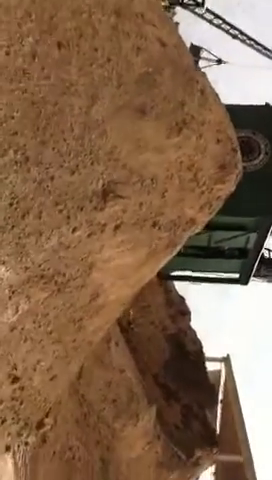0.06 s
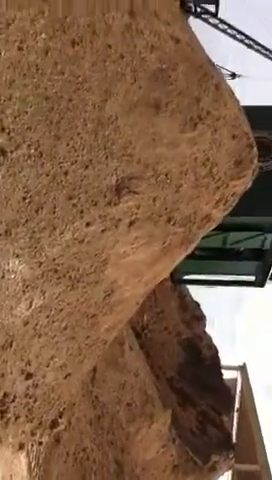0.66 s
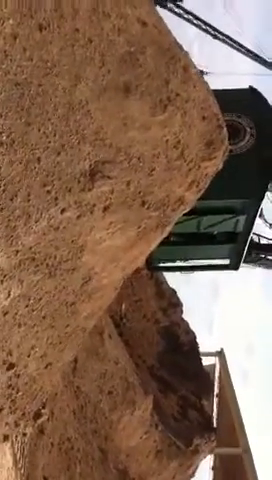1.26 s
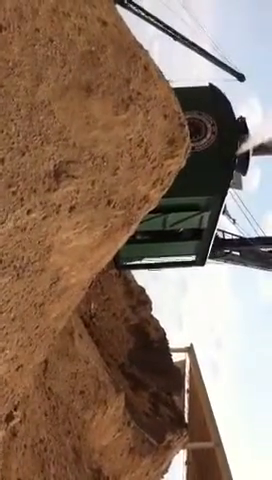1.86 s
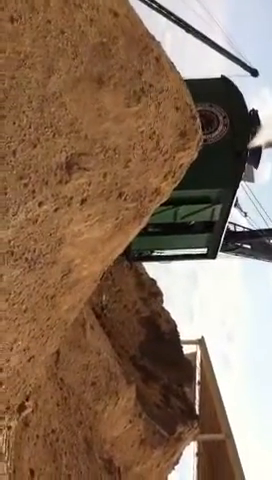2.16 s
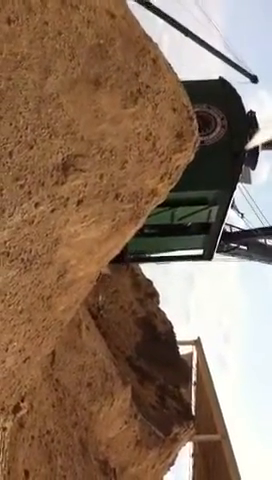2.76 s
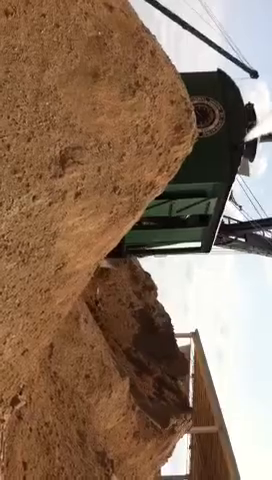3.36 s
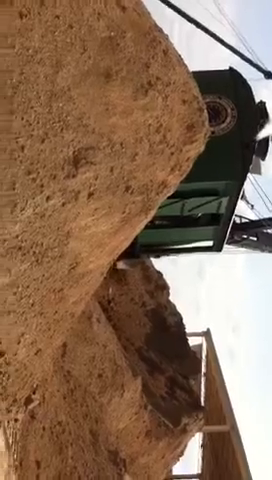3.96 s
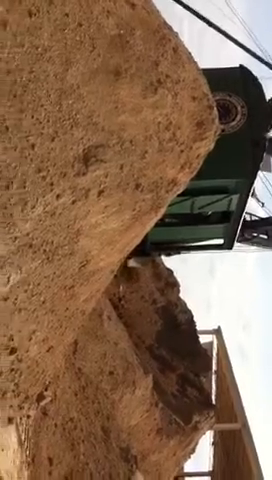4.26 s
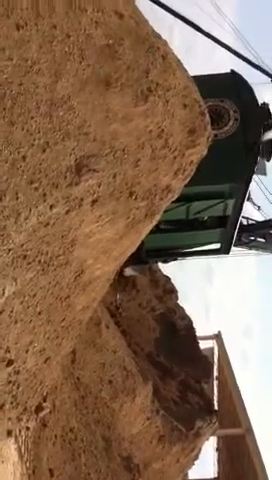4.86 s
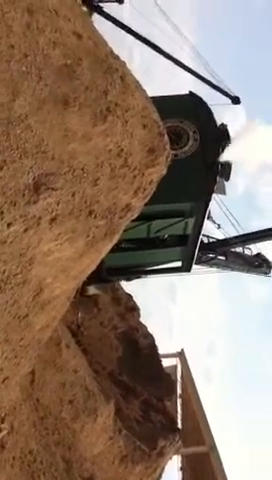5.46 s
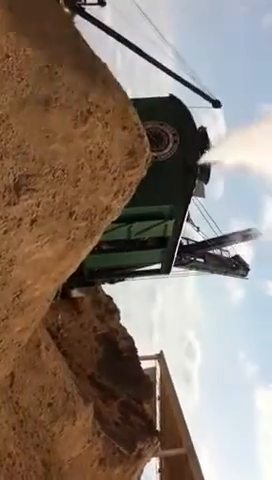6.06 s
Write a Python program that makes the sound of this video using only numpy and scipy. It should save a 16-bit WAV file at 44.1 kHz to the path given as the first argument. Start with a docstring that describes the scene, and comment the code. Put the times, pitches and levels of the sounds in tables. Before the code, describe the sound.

A steam shovel works outdoors, heard from one spot. For the first two seconds its gears rumble and clatter, chain links twitter, and leaking steam sings thinly and wheezes about twice a second over a soft chimney draught. From 0.5 seconds loose iron knocks irregularly, booming in the cab. The rumble and clatter swell toward 2.2 seconds, with a brake's short, stuttering squeals from about 1.8 to 2.3.

At 2.3 seconds the engine starts chuffing hard, louder than before, at roughly fourteen slightly uneven beats a second. Each puff is a hollow bark with a bright, spitting hiss, and the clatter fades beneath them. At about 4.3 seconds the chuffing dies away, leaving the soft draught and a low rumble. At 5.4 seconds it restarts with a brief spray of steam and keeps chuffing and hissing until the end, at about six seconds.

```python
"""A steam shovel works in the open air. First it swings behind a heap of earth: gears rumble and clatter,
chain links twitter, a soft draught blows up the stack (its chimney) and leaking steam sings and wheezes.
Loose iron knocks, a cab panel booms and a friction band squeals on its drum. At 2.3 s the engine takes
the load and chuffs hard through the stack, about fourteen beats a second. At 4.3 s it rests for a second,
leaving the draught and a low rumble, and then it starts again."""
import sys
import numpy as np
from scipy.fft import rfft, irfft, next_fast_len
from scipy.io import wavfile
from scipy.ndimage import map_coordinates

SR = 44100
rng = np.random.default_rng(int(sys.argv[2]) if len(sys.argv) > 2 else 0)


def transcribe(signal):
    """Save signal, clipped to [-1, 1], as a 16-bit WAV file at the path in sys.argv[1]."""
    frames = np.atleast_2d(signal).T
    limited = np.clip(frames, -1, 1)
    pcm = np.round(limited * 32767).astype(np.int16)
    wavfile.write(sys.argv[1], SR, pcm)


N = 269892
TIME = np.arange(N) / SR

# A TONE table gives a noise its balance of low and high. A MODES table lists the pitches a part rings at.
# How loud the low rumble is heard: it swells with the swing, dips under the chuffs
# and returns in the pause: time_s, level_db
RUMBLE_LEVELS = [(0, -42), (1.3, -39), (1.75, -39.5), (2.17, -33.5), (2.65, -43.5), (3.4, -50.5),
                 (3.8, -51), (4.5, -51), (4.75, -44.5), (5.35, -45), (5.65, -55)]
# The shaking frame: frequency_hz, level_db
FRAME_TONE = [(25, -34), (55, -25), (80, -15), (120, -3.5), (160, 0.5), (225, 1), (300, -2.5), (370, -4),
              (450, -21), (700, -36.5)]
# The low and the higher boom of a cab panel: frequency_hz, level_db
PANEL_LOW_TONE = [(130, -47), (195, -15), (212, 1), (230, -3.5), (330, -74)]
PANEL_HIGH_TONE = [(200, -50), (265, -3), (288, 7), (315, 0), (420, -62)]
# The effort of the swing, heard as clatter: time_s, level_db
CLATTER_LEVELS = [(0, -39), (1, -39.5), (1.7, -37.5), (2.05, -31), (2.3, -28), (2.9, -54), (3.2, -75)]
# Gear teeth and chains clattering: frequency_hz, level_db
CLATTER_TONE = [(210, -33), (350, -4), (537, -1.5), (726, 0), (878, -5.5), (1350, -5), (1610, -5.5),
                (2100, -8.5), (3080, -13.5), (3380, -21.5), (5190, -24), (6590, -20), (8230, -26.5),
                (9640, -27.5), (15500, -69.5)]
# The ringing of the stack: pitch_hz, width_hz, level_db
STACK_MODES = [(216, 50, -13.5), (322.6, 21.4, -5.5), (622, 143, -8), (753.5, 54, -3.5), (966, 108, -6),
               (1329, 124, -1), (1634, 157, 1), (1940, 318, 0), (2348, 240, 4), (2996, 263, -2.5),
               (3480, 234, -6), (3850, 230, -10), (4517, 140, -8.5)]
# Slow steam in the stack: frequency_hz, level_db
ROAR_TONE = [(150, 0), (220, 2), (320, -13), (450, 10), (750, 6.5), (1200, 3.5), (1400, -0.5), (1700, -1),
             (2200, -6), (2450, -3), (2600, -4.5), (2950, -11), (5000, -11)]
# The fizz of the draught: frequency_hz, level_db
FIZZ_TONE = [(2000, -28), (3000, -2), (4200, -12), (5400, -10), (6000, -2.5), (8000, -0.5), (9000, -10),
             (9700, -17), (10600, -6), (11400, -3.5), (13000, -10), (15500, -21)]
# Thin leaks at the pipe joints: pitch_hz, width_hz, level_db
PIPE_LEAKS = [(1610, 59, -61), (3390, 150, -54), (9700, 1200, -59.5)]
# Steam slipping past a gland, the seal around a moving rod: middle_s, spread_s, level_db
GLAND_WHEEZES = [(0.52, 0.1, -45), (1.12, 0.053, -46), (1.625, 0.11, -46), (2.03, 0.072, -61),
                 (2.143, 0.011, -33), (2.28, .06, -55)]
# The hiss of that gland: frequency_hz, level_db
GLAND_TONE = [(2500, -36), (4500, -10), (5600, -8.5), (6600, 1.5), (7500, -8), (11000, -13), (15500, -29)]
# Slack gears catching up with a knock: start_s, level_db, treble_db
GEAR_KNOCKS = [(0.524, -18.5, -7), (0.8, -22.5, -10), (1.101, -18, -18), (1.345, -26.5, 6.5),
               (1.62, -19.5, -2), (1.787, -28, -4), (1.998, -19, -10), (2.124, -17.5, 4.5),
               (2.209, -26, -12), (2.256, -28, -6)]
# The ringing of the cab: pitch_hz, width_hz, level_db
CAB_MODES = [(220, 50, -7), (626, 49, 2.5), (734, 51, 3.5), (980, 140, -7), (1237, 73, -5.5),
             (1570, 120, -7), (2310, 280, -13)]
# The sharp crack of a knock: frequency_hz, level_db
CRACK_TONE = [(500, -30), (1500, 6), (3500, -8), (5000, -14), (15000, -28)]
# The friction band grabbing its drum: start_s, length_s, pitch_hz, level_db
BAND_GRABS = [(1.788, 0.014, 1620, -30.5), (1.957, 0.015, 1620, -31), (2.019, 0.02, 1782, -22),
              (2.044, 0.069, 1676, -27.5), (2.126, 0.05, 1740, -27), (2.202, .08, 1680, -30)]
# The ringing of the band: pitch_hz, width_hz, level_db
RASP_MODES = [(1255, 40, -3), (1584, 33, 3.5), (2154, 25, 1), (2340, 45, -1)]
# The throttle (the steam tap) opening for a run of beats: start_s, lead_in_s, thump_db, spray_db
THROTTLE_OPENINGS = [(2.32, .01, -37, -50), (3.115, 0.012, -46, -31), (5.403, 0.051, -46, -26)]
# The engine's puffs of used steam: start_s, level_db
BEATS = [(2.309, -11.0), (2.358, -13.5), (2.403, -12.0), (2.492, -15.0), (2.532, -14.0), (2.593, -16),
         (2.644, -15.5), (2.71, -16), (2.785, -14.5), (2.847, -15), (2.958, -13), (3.106, -11.5),
         (3.155, -20), (3.213, -13.5), (3.299, -15.5), (3.391, -17.5), (3.469, -16.5), (3.542, -15.5),
         (3.608, -14.5), (3.667, -14.5), (3.746, -15.5), (3.792, -15.0), (3.871, -17.5), (3.933, -13.5),
         (4.011, -15.5), (4.086, -14), (4.16, -14.0), (4.277, -15.0), (5.38, -10.5), (5.492, -13.0),
         (5.598, -15.5), (5.665, -16), (5.742, -17.0), (5.788, -16.5), (5.87, -16.0), (5.943, -14),
         (6.042, -13.0)]
# How the hiss of the steam jet rises and falls against the bark of the beats: time_s, level_db
HISS_LEVELS = [(2.31, -10.5), (2.68, -3.0), (2.85, -5.0), (3.12, -7.5), (3.33, 1), (3.5, -6), (3.8, -1.5),
               (4.33, -4), (5.37, -9.5), (5.63, -2.5), (5.95, -6.5)]
# The jet from the nozzle in the stack: frequency_hz, level_db
JET_TONE = [(3000, -60), (4300.0, -14), (4900.0, -9), (5800.0, -1.5), (6600.0, 1.1), (8200.0, -5),
            (9700.0, -20), (10800.0, -10), (12500.0, -12), (14000.0, -18), (15500.0, -33)]
# The deep woof of a beat: frequency_hz, level_db
WOOF_TONE = [(30, -30), (90, -30.5), (160, -12), (290, 12), (420, -4), (580, 5.5), (900, 5), (1500, -17)]
# Air shoved out of the stack, and the water sprayed after it: frequency_hz, level_db
THUMP_TONE = [(20, -5), (45, -4), (80, -3), (140, 7), (220, -3), (500, -30)]
SPRAY_TONE = [(8000, -12), (10500, -5), (12500, 5), (14000, -5), (15500, -20)]


def amp(db):
    """Turn decibels into a number to multiply by."""
    return np.exp(np.asarray(db) * (np.log(10) / 20))


def unit(x):
    """Scale a signal to an average strength (rms) of 1."""
    return x / np.sqrt(np.mean(x ** 2) + 1e-20)


def curve(points):
    """Join (time_s, value) points with straight lines, giving one value per sample."""
    return np.interp(TIME, *np.transpose(points))


def noise():
    """Plain white noise."""
    return rng.standard_normal(N)


def wobble(rate):
    """A smooth curve through `rate` random values a second."""
    return map_coordinates(rng.standard_normal(int(N * rate / SR) + 4), [TIME * rate])


def filtered(x, response):
    """Multiply each frequency in x by response(hz)."""
    size = next_fast_len(N + SR // 2)
    return irfft(rfft(x, size) * response(np.fft.rfftfreq(size, 1 / SR)), size)[:N]


def coloured(x, tone):
    """Shape x with a TONE table and scale it to strength 1."""
    points_hz, db = np.transpose(tone)
    return unit(filtered(x, lambda hz: amp(np.interp(np.log(hz + 1), np.log(points_hz), db))))


def resonate(x, modes):
    """Let x ring at the pitches of a MODES table and scale it to strength 1."""
    def response(hz):
        return sum((-1) ** k * amp(db) * 1j * hz * width / (pitch ** 2 - hz ** 2 + 1j * hz * width)
                   for k, (pitch, width, db) in enumerate(modes))
    return unit(filtered(x, response))


def turbulence(rate, depth_db):
    """White noise that comes in small bursts."""
    return unit(noise() * amp(depth_db * wobble(rate)))


def grains(rate, spread_db):
    """Tiny random hits of uneven size, about `rate` a second."""
    hits = rng.random(N) < rate / SR
    return unit(hits * noise() * amp(spread_db * noise()))


def gearing(boom_from_s=1.56, boom_to_s=2.19, brake_from_s=1.72, brake_full_s=2.1):
    """The frame rumbles; as the shovel swings, teeth and chains clatter and a loaded panel booms."""
    rumble = amp(curve(RUMBLE_LEVELS)) * coloured(turbulence(rate=19, depth_db=2), FRAME_TONE)
    boom_db = -38 - 19 * np.maximum(boom_from_s - TIME, 0) - 47 * np.maximum(TIME - boom_to_s, 0)
    strain = np.interp(TIME, [brake_from_s, brake_full_s], [0, 1])  # braking wakes the higher boom
    panel = coloured(noise(), PANEL_LOW_TONE) + 1.6 * strain * coloured(noise(), PANEL_HIGH_TONE)
    rattle = turbulence(rate=60, depth_db=1.35) + 0.14 * grains(rate=400, spread_db=-1)
    clatter = amp(curve(CLATTER_LEVELS)) * coloured(rattle, CLATTER_TONE)
    return rumble + amp(boom_db) * panel + clatter


def chain_links(count=110, within_s=1.8, loudest_db=-39.5, rise_s=0.002):
    """Chain links give a twitter of tiny metal chirps, each at its own pitch."""
    twitter, age = np.zeros(N), np.arange(SR // 40) / SR
    for when, height, softness in rng.random((count, 3)):
        pitch_hz = 2700 + 1200 * height
        chirp = age / rise_s * np.exp(1 - age / rise_s) * np.sin(2 * np.pi * pitch_hz * age)
        start = round(within_s * when * SR)
        twitter[start:start + len(age)] += amp(loudest_db - 5.4 * softness - 3 * height) * chirp
    return twitter


def stack(x, low_hz=150, high_hz=5000):
    """The stack rings to whatever blows through it and lets out little bass or treble."""
    def let_out(hz):
        return 1 / np.sqrt((1 + (hz / high_hz) ** 12) * (1 + (low_hz / (hz + 1)) ** 4))
    return unit(filtered(resonate(x, STACK_MODES), let_out))


def draught(start_db=-49.5, growth_db_per_s=2):
    """A soft flow roars up the stack with a wavering fizz, growing with the boiler pressure."""
    roar = coloured(stack(noise()), ROAR_TONE)
    fizz = coloured(noise(), FIZZ_TONE) * amp(-7 + 0.6 * wobble(5.4))
    return amp(start_db + growth_db_per_s * TIME) * (roar + fizz)


def roof_echo(x, delay_s=0.001353, share=0.16):
    """The cab roof bounces the stack's sound back a moment later, which makes it hollow."""
    return filtered(x, lambda hz: 1 + share * np.exp(-2j * np.pi * hz * delay_s))


def leaks(singing_end_s=2.2, fade_s=0.5):
    """Pipe joints sing thinly until the engine draws the steam, and a gland wheezes once a stroke."""
    singing = sum(amp(db + 4.4 * wobble(8.8)) * resonate(noise(), [(hz, width, 0)])
                  for hz, width, db in PIPE_LEAKS)
    fade = np.clip((singing_end_s - TIME) / fade_s, 0, 1)
    strokes = sum(amp(db) * np.exp(-0.5 * ((TIME - middle_s) / spread_s) ** 2)
                  for middle_s, spread_s, db in GLAND_WHEEZES)
    return fade * singing + strokes * coloured(noise(), GLAND_TONE)


def knocks(rise_s=0.0098, fade_s=0.11, rebound_s=0.018, rebound_db=-13):
    """Loose iron strikes, bounces once and chatters briefly, booming in the cab."""
    blows, cracks = np.zeros((2, N))
    for start_s, db, treble_db in GEAR_KNOCKS:
        for delay_s, loss_db in [(0, 0), (rebound_s, rebound_db)]:
            age = np.clip(TIME - start_s - delay_s, 0, 1)
            blow = (1 - np.exp(-age / rise_s)) * amp(db + loss_db - 60 * age / fade_s)
            blows += blow
            cracks += blow * amp(treble_db)
    boom = resonate(turbulence(rate=200, depth_db=-3.5), CAB_MODES)
    crack = coloured(noise(), CRACK_TONE)
    return amp(-2) * blows * boom + amp(-6.5) * cracks * crack


def band_squeal(swell_s=0.0036, let_go_s=0.023):
    """The friction band sticks and slips on its drum: each grab is a shaky note with a softer rasp."""
    grip = np.zeros(N)
    for start_s, length_s, _, db in BAND_GRABS:
        swell = (TIME - start_s) / swell_s
        release = (start_s + length_s - TIME) / let_go_s + 0.5
        grip += amp(db) * np.clip(np.minimum(swell, release), 0, 1)
    pitch_hz = curve([(start_s + length_s / 2, hz) for start_s, length_s, hz, _ in BAND_GRABS])
    phase = 2 * np.pi * np.cumsum(pitch_hz * (1 + 0.02 * wobble(450))) / SR
    note = unit(np.sin(phase) * amp(3.5 * wobble(140)))
    rasp = resonate(noise(), RASP_MODES)
    return grip * (note + amp(-4.5) * rasp)


def valve_beats(hold_s=0.046, rise_share=0.41, slowest_beat_s=0.11):
    """The strength of bark and jet over time: each beat opens, holds, then dies away ever faster."""
    # Steam slips through while the throttle is still opening.
    bark_power = jet_power = sum(amp(-15.5 - 20 * np.abs(TIME - start_s) / lead_in_s) ** 2
                                 for start_s, lead_in_s, *_ in THROTTLE_OPENINGS)
    gaps_s = np.diff([start_s for start_s, _ in BEATS], append=np.inf)
    for (start_s, db), gap_s in zip(BEATS, gaps_s):
        age = TIME - start_s
        rise_s = rise_share * min(gap_s, slowest_beat_s)  # slower beats start more softly
        valve = np.sin(np.pi / 2 * np.clip(age / rise_s, 0, 1)) ** 2
        closed_s = np.clip(age - hold_s, 0, 1)
        pressure = amp(db - 60 * closed_s / 0.55 - 606 * closed_s ** 2)
        bark_power = bark_power + (valve * pressure) ** 2
        jet_power = jet_power + (valve ** 1.35 * pressure) ** 2  # hisses only once the valve is well open
    return np.sqrt(bark_power), np.sqrt(jet_power)


def exhaust(sizzle_above_hz=9700, dull_db=-4.5, brighten_s=0.25):
    """Each puff of steam barks in the stack and hisses at the nozzle; wet steam spits in the jet."""
    bark_strength, jet_strength = valve_beats()
    flutter = amp(0.64 * wobble(90) + 0.38 * wobble(450))  # swirls shake the whole jet
    spit = grains(rate=970, spread_db=-1.5)
    bark = stack(turbulence(rate=180, depth_db=-0.2) + 0.3 * spit)
    hiss = coloured(turbulence(rate=220, depth_db=0.94) + 0.42 * spit, JET_TONE)
    # The top of the hiss starts dull and brightens as the engine gets going.
    running_s = np.maximum(TIME - BEATS[0][0], 0)
    sizzle = filtered(hiss, lambda hz: hz > sizzle_above_hz)
    hiss = hiss - sizzle + amp(dull_db * np.exp(-running_s / brighten_s)) * sizzle
    hiss_db = curve(HISS_LEVELS)
    woof = amp(-28.5 - 1.07 * hiss_db) * coloured(noise(), WOOF_TONE)  # dull beats carry more bass
    return flutter * (bark_strength * (amp(-4) * bark + woof) + jet_strength * amp(hiss_db - 2.5) * hiss)


def first_steam(thump_rise_s=0.004, thump_fade_s=0.12, spray_rise_s=0.02):
    """As the throttle opens, steam shoves the air out of the stack with a thump, then sprays out water."""
    shove, spray = np.zeros((2, N))
    for start_s, _, thump_db, spray_db in THROTTLE_OPENINGS:
        age = np.maximum(TIME - start_s, 0)
        shove += (1 - np.exp(-age / thump_rise_s)) * amp(thump_db - 60 * age / thump_fade_s)
        spray += amp(spray_db) * age / spray_rise_s * np.exp(1 - age / spray_rise_s)
    thump = coloured(noise(), THUMP_TONE)
    drops = coloured(turbulence(rate=400, depth_db=2.5), SPRAY_TONE)
    return shove * thump + spray * drops


def scene():
    """All parts of the machine, heard from one spot."""
    steam = roof_echo(exhaust() + draught()) + first_steam() + leaks()
    iron = gearing() + chain_links() + knocks() + band_squeal()
    return (steam + iron)[None]


def record(dry):
    """The microphone rounds off the tallest peaks and drops the very highest treble."""
    ceiling, top_hz = 0.8, 15680
    rounded = dry[0] / (1 + np.abs(dry[0] / ceiling) ** 6) ** (1 / 6)
    return filtered(rounded, lambda hz: hz < top_hz)[None]


dry = scene()
out = record(dry)
transcribe(out)
```